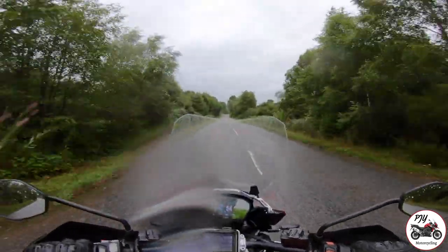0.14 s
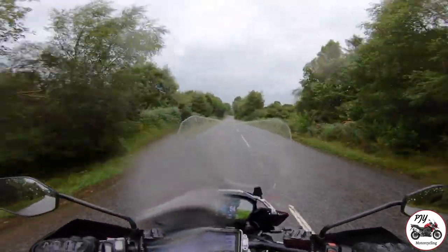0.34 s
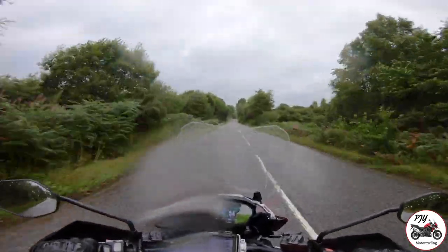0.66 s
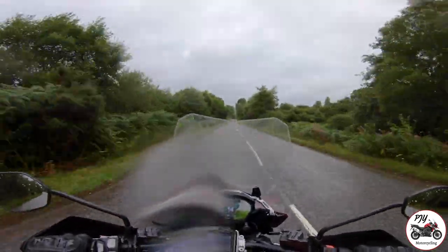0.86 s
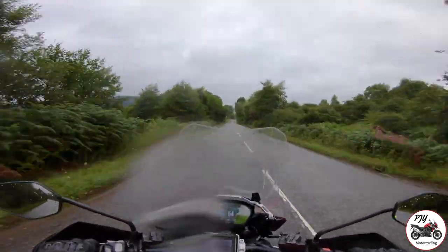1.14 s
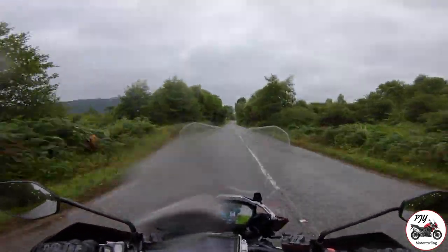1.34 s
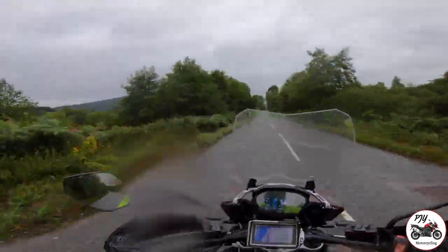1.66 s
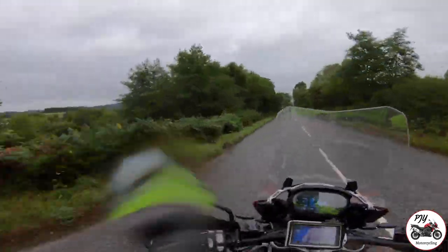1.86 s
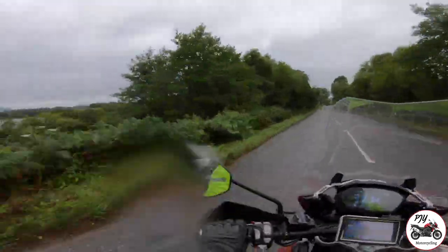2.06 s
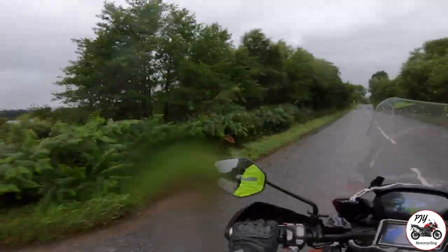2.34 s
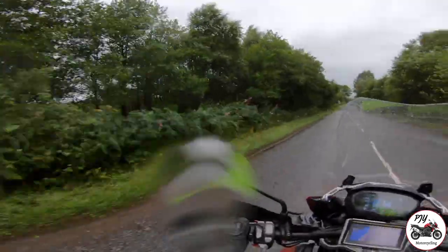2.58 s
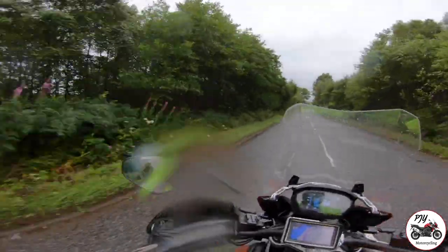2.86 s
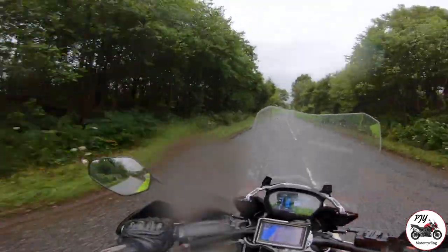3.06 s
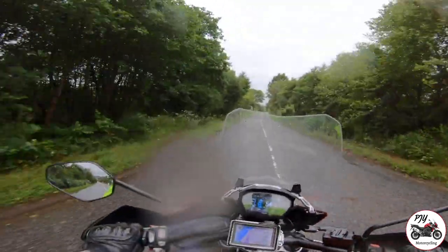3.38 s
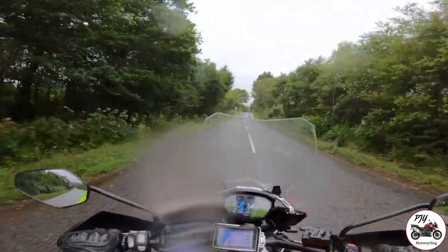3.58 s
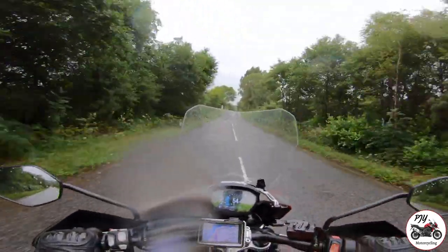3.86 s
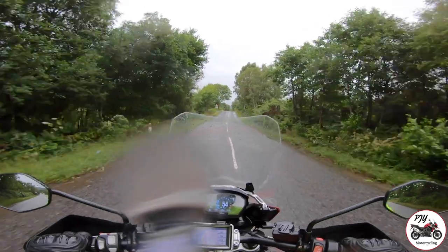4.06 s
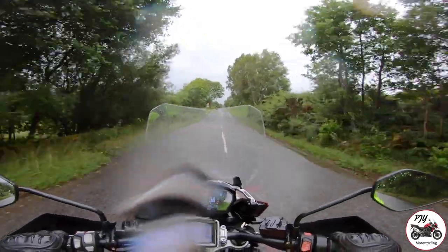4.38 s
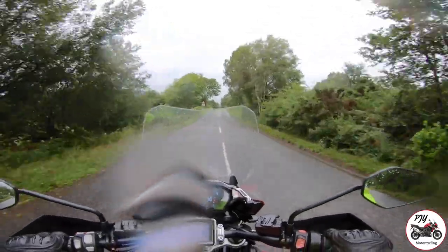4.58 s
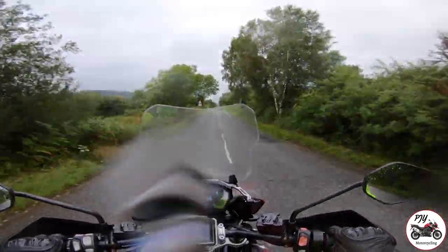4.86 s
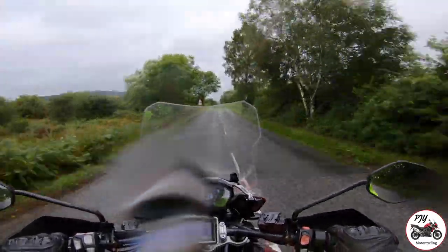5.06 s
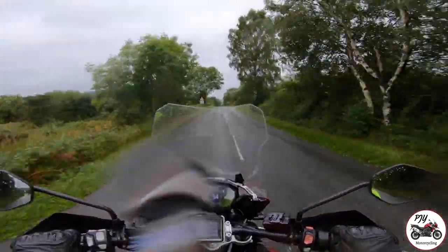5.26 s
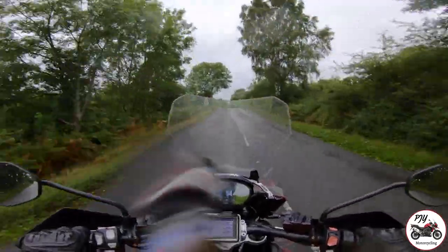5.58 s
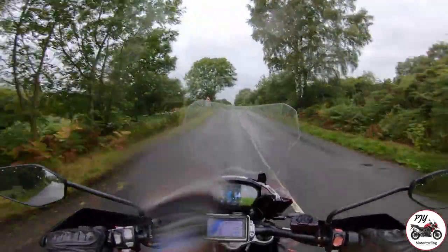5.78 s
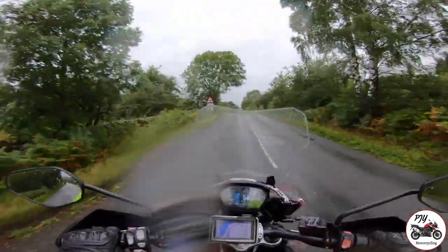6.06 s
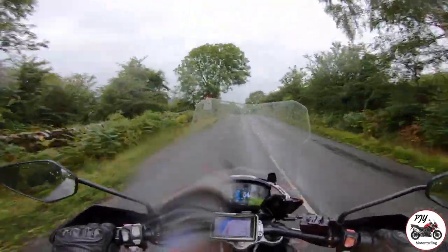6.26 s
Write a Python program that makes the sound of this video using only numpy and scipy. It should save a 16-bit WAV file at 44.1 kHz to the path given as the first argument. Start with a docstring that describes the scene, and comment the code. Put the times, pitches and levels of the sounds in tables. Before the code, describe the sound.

Throughout about 6.4 seconds, a three-cylinder motorcycle cruises on wet tarmac, heard from a microphone worn by the rider. A deep hum near 75 hertz throbs unevenly, easing almost imperceptibly in pitch, with low overtones, wavering gear whine and fast valve clatter. Strong subsonic-to-low wind buffeting, muffled thuds and airy rush cover it, while tyres give a coarse midrange roar and fine wet hiss. Drops tick irregularly on plastic, with a tight cluster at 1.0. From 1.3 to 2.0 the rider turns aside: clatter recedes, road roar rises slightly, and a faint sizzle and denser ticks appear. Gusts thump at 1.7 and 2.05; the loudest drop cracks at 2.43. By 3.3 the head faces forward, with a spattering drop at 3.36. Wind pops at 3.83 and around 5.15 to 5.25; steady riding continues, ticking once more at 6.3.

```python
"""A three-cylinder motorcycle cruises on a wet road, heard close up from a camera worn by the rider.
The exhaust drones as sines on the firing rate, the gears whine in wavering lines, and bursts of noise
clatter in step with the firings. Filtered noise makes the wind, with thuds and pops at the microphone,
the tyre hiss from the road below, and the mist; drops of water tick as short rings and splashes
against the camera housing."""
import sys
import numpy as np
from scipy import signal
from scipy.fft import rfft, irfft, next_fast_len
from scipy.io import wavfile
from scipy.ndimage import uniform_filter1d

SR = 44100
rng = np.random.default_rng(int(sys.argv[2]) if len(sys.argv) > 2 else 0)


def dump(signal):
    """Clip the signal to [-1, 1] and save it as 16-bit WAV at the path in sys.argv[1]."""
    limited = np.clip(np.atleast_2d(signal).T, -1, 1)
    pcm = np.round(limited * 32767).astype(np.int16)
    wavfile.write(sys.argv[1], SR, pcm)


N = 283246
TIME = np.arange(N) / SR  # s

# engine speed on a steady throttle, before its small flutter: (time [s], firing rate [Hz])
SPEED = [(0, 75.56), (1.3, 75.55), (2, 75.2), (2.7, 75.04), (4.4, 75.16), (5.3, 75.02), (5.9, 74.69),
         (6.42, 74.57)]
# deep hum of the exhaust at the firing rate, before its throb: (time [s], level [dB])
HUM = [(0, -24), (.45, -25), (.9, -27.5), (1.2, -31), (1.65, -25), (2.2, -26.5), (2.8, -27.5), (3.15, -25),
       (3.55, -28), (3.9, -23), (4.15, -31.5), (4.4, -24.5), (4.65, -29), (5.05, -24), (5.3, -31),
       (5.8, -26.5), (6.42, -28.5)]
# exhaust overtones: (multiple of the firing rate)
EXHAUST_ORDERS = [3, 4, 5]
# their levels at the start, before road swell and waver: (level [dB])
EXHAUST_DB = [-38.5, -35.5, -50]
# their drift as the engine eases off: (slope [dB per s])
EXHAUST_DB_PER_S = [0.53, -0.17, 0]

# lines of the gear and chain whine: (multiple of the firing rate)
GEAR_ORDERS = [11.18, 12.65, 19.17, 22.36, 22.61, 26.6, 28.75, 29.95, 44.65]
# their balance at the start: (relative level [dB])
GEAR_DB = [-0.5, -4, -5, -14.5, -12.5, -10, -20.5, -14.5, -20.5]
# drift of that balance as the load on the gears eases: (slope [dB per s])
GEAR_DB_PER_S = [0, -1.8, -2.5, 1, 0.1, 0, 0.8, -1.3, 0]
# swell of the whine with the load on the gears: (time [s], level about the usual [dB])
WHINE = [(0, -1), (.58, 0.5), (.7, -0.5), (1.0, 3), (1.4, -1), (1.8, 0.5), (2.6, 2.5), (3.25, 1),
         (3.55, -1.5), (3.88, 4), (4.05, 0), (4.5, -.5), (4.8, -1), (5.15, 0), (5.38, -3), (5.65, 3),
         (6.42, -0.5)]

# swell of machine and road noise from below the rider: (time [s], level about the usual [dB])
ROAD = [(0, -2.5), (.25, -.5), (.6, -0.3), (.8, -1.5), (.97, -1), (1.1, -3.5), (1.3, -2), (1.8, -1),
        (2.6, -1), (2.87, -2), (3.25, 1.85), (3.6, 0.5), (3.95, 0.6), (4.35, 0.4), (4.7, -1.5), (5.1, 0.5),
        (5.6, -2.2), (6.42, 1.2)]
# the rider looks to the side and back: (time [s], share of the full turn [0-1])
HEAD_TURN = [(1.3, 0.09), (2.05, 1), (2.65, 0.9), (3.3, 0)]
# strength of the airstream on the camera: (time [s], level about the usual [dB])
AIRSTREAM = [(0, -2.5), (.3, -1.5), (.6, 0), (.95, 0.5), (1.1, -2.5), (1.25, -1), (2.0, 1.5), (2.25, -3.5),
             (2.8, -1.5), (3.35, 2.5), (3.65, -1.5), (3.95, 2.5), (4.25, -3), (4.75, -0.5), (5.2, -1),
             (5.55, -2), (6.42, 1.5)]

# spectra of the noise layers, each: (frequency [Hz], relative level [dB])
CLATTER_SPECTRUM = [(300, -48), (1000, -19.5), (1800, -6), (2000, -1), (2170, 3), (2400, -2), (2540, -2),
                    (2720, -10), (3100, -14.5), (4200, -36), (12000, -87)]  # valve gear
BUFFET_SPECTRUM = [(2, -5), (6, 1), (16, -2), (30, -7), (50, -15), (80, -25), (140, -38), (400, -65),
                   (4000, -130)]  # large eddies
THUD_SPECTRUM = [(30, -24), (70, 1), (110, 0.5), (165, -1.5), (250, -10), (400, -23), (1000, -51),
                 (10000, -110)]  # smaller eddies that thud
RUSH_SPECTRUM = [(60, -22.5), (150, -6.5), (220, 1.5), (330, 1), (430, 0), (520, -5.5), (610, -14),
                 (800, -22.5), (2000, -46.5), (12000, -86.5)]  # air rushing past
TYRE_SPECTRUM = [(100, -51), (400, -28), (650, -6.5), (715, 5), (745, 0), (785, -0.5), (900, 1.5),
                 (1050, -0.5), (1220, -2.5), (1370, -2), (1550, -6), (1850, -8.5), (4000, -39),
                 (12000, -89)]  # tread on tarmac
SPRAY_SPECTRUM = [(1500, -10), (2800, -2.5), (3120, -4), (3350, 2.5), (3600, 1.5), (4000, 1.5), (4150, -2),
                  (4350, -8), (4600, -9.5), (5300, -13), (6900, -23.5), (8200, -31.5), (9500, -40),
                  (11000, -43.5), (16000, -53.5)]  # water flung by the tread
MIST_SPECTRUM = [(2000, -29), (4500, -3.5), (5800, 1.5), (7500, -9), (8400, -17), (9300, -6),
                 (10500, -25.5), (16000, -35)]  # tiny droplets on the camera
# how the camera housing passes a blow: (frequency [Hz], gain [dB])
HOUSING = [(800, -7), (2000, -1), (3800, 1.5), (5500, 1), (7000, -8), (9500, -20), (11000, -32),
           (16000, -35)]

# gusts on the microphone:
# (centre time [s], length [s], eddy rise [dB], thud rise [dB], rush rise [dB])
GUSTS = [(0.287, .26, 3.5, 5, 3.5), (0.525, 0.47, 2.5, -1.5, 0.5), (0.943, 0.095, 2, 0, 2.5),
         (1.438, 0.14, -1, 2, 3.5), (1.706, 0.33, -0.5, 8, 0.5), (1.85, 0.14, 0.5, 0.5, 1),
         (2.044, 0.2, 2, 9, -1), (2.452, 0.15, 6.5, 7, 1.5), (2.657, 0.13, 4, 8.5, 2.5),
         (3.023, 0.15, -2, 6, 0.5), (3.227, .3, -2, 3.5, 1), (3.383, 0.24, 0, 1, 2.5),
         (3.835, 0.12, -5, 9, 2), (3.964, 0.15, 2, -5, 1.5), (4.372, 0.33, 1.5, 3.5, 4),
         (4.506, 0.13, 6, 6, 3.5), (4.918, 0.36, 1.5, 5, -1), (5.124, 0.17, 5, 9.5, 3.5),
         (5.266, 0.13, 1.5, 6, 1), (5.75, .14, -4, -4, 2), (6.32, 0.2, -1.5, -2, 2)]
# lulls and changes of pressure between gusts: (centre time [s], length [s], level change [dB])
LULLS = [(0.78, 0.2, -7), (1.122, 0.14, -7), (1.543, .1, -1.5), (2.296, 0.2, 3.5), (2.9, .1, 1),
         (4.156, .16, 0), (4.6, 0.16, -7), (5.38, 0.079, -2), (5.56, 0.12, 2.5)]
# tight vortices at the microphone, before the band-pass: (time [s], peak level [dB], length [s])
POPS = [(1.435, -20, .005), (1.706, -9, .016), (2.044, -11, .004), (3.830, -7, .01), (5.1395, -14, 0.002),
        (5.171, -11, .003), (5.259, -14, .003)]
# big drops on the housing:
# (time [s], relative strength [dB], ring [Hz], splash share [0-1], spatter after it [0-1])
DROPS = [(.0144, -17.5, 4040, 0.8, 0.1), (.0359, -24, 4200, .45, .1), (0.4955, -16, 3900, 0.57, .15),
         (0.5692, -14, 3620, 0.16, 0.3), (0.7296, -16, 4400, 0.55, 0), (0.772, -16.5, 3640, 0.34, .1),
         (.9195, -25, 4200, 0.6, .1), (.9873, -21, 4330, .6, .1), (0.9906, -7.5, 2600, 0.28, 0),
         (.9918, -10.5, 4120, .5, .33), (.9935, -20, 3850, 0.2, .05), (1.0395, -22, 4200, .5, .1),
         (1.1535, -27, 4200, .6, .1), (1.16, -28, 4200, .6, .1), (1.2386, -22, 3780, 0.4, .1),
         (1.273, -18, 3880, 0.37, 0.1), (1.3781, -27, 4200, 0.7, .1), (1.7448, -19, 3160, 0.4, 0.4),
         (1.9882, -16.5, 4020, 0.45, .2), (2.0352, -24, 4000, 0.5, .1), (2.103, -13.5, 4200, 0.5, 0.2),
         (2.1228, -17, 4280, .45, 0), (2.1552, -24, 4200, 0.4, .1), (2.2017, -18, 3900, .5, .1),
         (2.339, -13, 3760, 0.15, 0.2), (2.357, -9.5, 3840, 0.5, 0.25), (2.3625, -18, 3840, 0.1, 0.2),
         (2.3845, -23, 4200, 0.5, 0.2), (2.4319, -1.7, 3800, 0.47, 0.26), (2.4695, -15, 4300, 0.64, 0.1),
         (2.5063, -22, 4400, 0.6, 0), (2.5636, -18, 3700, .2, 0), (2.7181, -20, 4170, 0.5, 0.2),
         (2.7725, -20, 3990, .3, .1), (2.8677, -25, 4400, .5, .3), (2.924, -20, 3900, .2, 0.2),
         (2.9472, -17.5, 4100, .45, .1), (3.0023, -23, 4200, 0.5, .1), (3.1577, -24, 4200, .5, 0.2),
         (3.3567, -11.5, 3400, 0.33, 0.57), (3.4447, -17, 3760, 0.15, .1), (3.6666, -20, 3690, .5, .1),
         (3.6918, -20, 3900, 0.7, .1), (3.6998, -17.5, 3780, 0.2, .15), (3.7289, -23, 4000, .45, 0.4),
         (3.7685, -25, 4200, 0.5, .1), (3.7939, -21, 4200, 0.3, .1), (3.9655, -26, 4400, 0.1, .1),
         (4.1963, -28, 4200, 0.6, .1), (4.236, -20, 3684, 0.2, 0.2), (4.343, -19, 3850, .35, .1),
         (4.842, -17, 3650, 0.27, .1), (5.2283, -20, 5200, 0.53, 0.1), (5.312, -21, 4100, 0.4, .1),
         (5.404, -20, 4270, 0.4, .1), (5.4198, -24, 4600, .35, .1), (5.497, -22, 4200, 0.6, .1),
         (5.6125, -24, 4300, 0.6, .2), (5.7913, -21, 4000, 0.4, 0), (5.8374, -21.5, 4000, 0.23, .1),
         (5.8674, -21, 4700, .56, 0), (6.0615, -23, 3770, 0.3, 0), (6.253, -27, 4260, 0.5, .1),
         (6.3053, -12.5, 4300, .45, .15)]

# wind layers: level in the usual airstream (dB) and how much each follows it (dB per dB)
EDDY_DB, THUD_DB, RUSH_DB = -15.5, -31, -28
EDDY_FOLLOW, THUD_FOLLOW, RUSH_FOLLOW = 0.67, 1.46, 0.44
# the rush builds along the road and the tyre roar fades as the machine eases off (dB per s)
RUSH_DB_PER_S, ROAR_DB_PER_S = 0.1152, -0.1649
# usual levels with the head straight (dB), and their change with the head fully turned (dB)
ROAR_DB, CLATTER_DB, SPRAY_DB, WHINE_DB, MIST_DB = -29.5, -33, -40, -36, -72
ROAR_TURN_DB, CLATTER_TURN_DB, SPRAY_TURN_DB, MIST_TURN_DB = 1.5, -3.5, 0.6, 7.5
# small drops: splash share and spatter (0-1), and extra hits at full turn (times the usual rate)
SMALL_SPLASH, SMALL_SPATTER, TURN_EXTRA_DROPS = 0.4, .1, 2.5
TOP_HZ = 15800  # upper edge of the camera's sound


def undb(db):
    """Decibels to gain."""
    return 10 ** (np.asarray(db) / 20)


def unit(x):
    """Scale to rms 1."""
    return x / np.sqrt(np.mean(x ** 2))


def curves(table):
    """Each column of a table, joined by straight lines in time."""
    s, *columns = np.transpose(table)
    return [np.interp(TIME, s, c) for c in columns]


def colour(x, spectrum):
    """Causal minimum-phase filter with the given (frequency [Hz], level [dB]) response."""
    size = next_fast_len(N + 8192)
    hz, db = np.transpose(spectrum)
    bins = np.maximum(np.arange(size // 2 + 1) * SR / size, 1)
    response_db = np.interp(np.log(bins), np.log(hz), db)
    cepstrum = irfft(np.log(undb(response_db)), size)
    # folding the cepstrum onto positive time makes the filter causal
    cepstrum[1:size // 2] *= 2
    cepstrum[size // 2 + 1:] = 0
    response = np.exp(rfft(cepstrum))
    return irfft(rfft(x, size) * response, size)[:N]


def noise(spectrum, gate=1):
    """Gated noise through a response, rms 1."""
    return unit(colour(gate * rng.standard_normal(N), spectrum))


def walk(rate):
    """Smooth chance with about rate turns a second; rms 1."""
    k = max(int(SR / rate), 2)
    steps = np.repeat(rng.standard_normal(N // k + 2), k)
    smooth = uniform_filter1d(uniform_filter1d(steps, k), k)
    return unit(smooth[:N])


def bump(s, length):
    """A smooth swell from 0 to 1 and back, centred on s."""
    return np.cos(np.pi * np.clip((TIME - s) / length, -.5, .5)) ** 2


def exhaust(firings, hum_db, road_db, throb_db=1.9, waver_db=1.37):
    """The silencer leaves a deep, throbbing hum and a few low overtones of the firings."""
    out = undb(hum_db + throb_db * walk(14)) * unit(np.sin(2 * np.pi * firings))
    for order, db, slope in zip(EXHAUST_ORDERS, EXHAUST_DB, EXHAUST_DB_PER_S):
        level = undb(db + road_db + slope * TIME + waver_db * walk(7.8))
        out = out + level * unit(np.sin(2 * np.pi * (order * firings + rng.random())))
    return out


def gears(firings, whine_db):
    """Meshing teeth whine; backlash and changing load make each line waver."""
    lash, waver_db = .38, 1.5  # phase wander (rad) and level wander (dB)
    lines = np.zeros(N)
    for order, db, slope in zip(GEAR_ORDERS, GEAR_DB, GEAR_DB_PER_S):
        level = undb(db + slope * TIME + waver_db * walk(20))
        lines += level * np.sin(2 * np.pi * order * firings + lash * walk(30))
    return unit(lines) * undb(whine_db)


def clatter(firings, decay=0.39, depth=0.89):
    """Valves land six times in each engine cycle of three firings, each with its own force."""
    force = np.array([0.87, 0.31, 1.0, 0.72, 0.75, 0.16])
    beats = 2 * firings
    fade = np.exp(-(beats % 1) / (2 * decay))  # decay counts in firings
    gate = 1 + depth * force[beats.astype(int) % len(force)] * fade
    return noise(CLATTER_SPECTRUM, gate)


def gusts():
    """Gusts swell and die away, lulls shift eddy and thud together; eddy, thud and rush changes in dB."""
    eddy_db, thud_db, rush_db = sum(np.outer(rise_db, bump(s, length)) for s, length, *rise_db in GUSTS)
    lull_db = sum(db * bump(s, length) for s, length, db in LULLS)
    return eddy_db + lull_db, thud_db + lull_db, rush_db


def wind(air_db, flutter_db=0.5, thud_flutter_db=1.5):
    """Large eddies push on the microphone; smaller ones thud and rush past it in shared flurries."""
    buffet = noise(BUFFET_SPECTRUM)
    # even out chance swells so that the tables set the level
    buffet /= np.sqrt(uniform_filter1d(buffet ** 2, SR // 8))
    flurries = undb(flutter_db * walk(30))
    thud = noise(THUD_SPECTRUM, flurries * undb(thud_flutter_db * walk(36)))
    rush = noise(RUSH_SPECTRUM, flurries)
    eddy_rise_db, thud_rise_db, rush_rise_db = gusts()
    eddy_db = EDDY_DB + EDDY_FOLLOW * air_db + eddy_rise_db
    thud_db = THUD_DB + THUD_FOLLOW * air_db + thud_rise_db
    rush_db = RUSH_DB + RUSH_FOLLOW * air_db + RUSH_DB_PER_S * TIME + rush_rise_db
    return buffet * undb(eddy_db) + thud * undb(thud_db) + rush * undb(rush_db)


def tyres(roar_db, spray_db, grain_db=1.5):
    """Tread roars on the coarse tarmac and flings a fine, grainy spray."""
    roar = noise(TYRE_SPECTRUM) * undb(roar_db)
    spray = noise(SPRAY_SPECTRUM, undb(grain_db * walk(900))) * undb(spray_db)
    return roar + spray


def mist(turn, linger_s=.55, grain_db=4):
    """Countless tiny droplets sizzle on the camera, most while the head is turned and a moment after."""
    wet = np.maximum(turn, np.interp(TIME - linger_s, TIME, turn))
    sizzle = noise(MIST_SPECTRUM, undb(grain_db * walk(700)))
    return sizzle * undb(MIST_DB + MIST_TURN_DB * wet)


def tick(ring_hz, share, spatter, splash_db=3, fragment_db=0, snap_db=8, knock_hz=2450, knock_db=-13):
    """A drop knocks the shell, rings the plastic for a few cycles and splashes; the wave comes back once.
    A drop that shatters also snaps in the top treble, and its fragments spatter after it."""
    decay_s, echo_s, echo, spatter_s, snap_hz = .001, .002, .35, .006, 11500
    t = TIME[:SR // 30]
    envelope = (1 - np.exp(-t / .0001)) * np.exp(-t / decay_s)
    knock = undb(knock_db) * np.sin(2 * np.pi * knock_hz * t)
    ring = envelope * (np.sin(2 * np.pi * ring_hz * t) + knock)
    burst = envelope * rng.standard_normal(len(t))
    # a drop that rings low also splashes low
    highpass = signal.butter(2, np.clip(0.37 * ring_hz, 100, 5000), "high", fs=SR, output="sos")
    splash = signal.sosfilt(highpass, burst)
    spray = (t > echo_s) * np.exp(-t / spatter_s) * rng.laplace(size=len(t))
    fragments = signal.sosfilt(highpass, spray)
    snap = signal.sosfilt(signal.butter(6, snap_hz, "high", fs=SR, output="sos"), burst)
    shatter = undb(fragment_db) * unit(fragments) + undb(snap_db) * unit(snap)
    share = np.clip(share, 0, 1)
    body = (1 - share) * unit(ring) + share * undb(splash_db) * unit(splash)
    hit = np.std(ring) * (body + max(spatter, 0) * shatter)
    return hit + echo * np.interp(t - echo_s, t, hit, left=0)


def drops(turn, small_db=-33, spread_db=3, count=170):
    """Big drops strike the housing one by one; small ones fall at random, thicker with the head turned."""
    fallen = np.cumsum(1 + max(TURN_EXTRA_DROPS, 0) * np.clip(turn, 0, 1))
    small = []
    for a, b, c in rng.random((count, 3)):
        s = np.interp(a * fallen[-1], fallen, TIME)
        db = small_db + spread_db * (2 * b - 1)
        small.append((s, db, 3000 + 2000 * c, SMALL_SPLASH, SMALL_SPATTER))
    out = np.zeros(N + SR)
    for s, db, ring_hz, share, spatter in list(DROPS) + small:
        start, hit = int(s * SR), tick(ring_hz, share, spatter)
        out[start:start + len(hit)] += undb(db) * hit
    return colour(out[:N], HOUSING)


def pops(air_db, small_db=-25, spread_db=3, small_s=0.0037, count=150):
    """A vortex core crossing the microphone sucks the pressure down; faint ones pass at random."""
    small = []
    for a, b, c in rng.random((count, 3)):
        s = a * TIME[-1]
        db = small_db + spread_db * (2 * b - 1) + np.interp(s, TIME, air_db)
        small.append((s, db, small_s * (.5 + c)))
    t, out = TIME[:SR // 10], np.zeros(N + SR)
    for s, db, length in list(POPS) + small:
        start = int(s * SR)
        age = t / max(length / 4, 1e-4)  # the dip is deepest at age 1
        out[start:start + len(t)] -= undb(db) * age * np.exp(1 - age)
    return signal.sosfilt(signal.butter(2, [20, 3000], "band", fs=SR, output="sos"), out[:N])


def scene():
    """All sources at the one microphone; turning the head trades engine clatter for road noise."""
    firing_hz = curves(SPEED)[0] * (1 + 0.00051 * walk(7))
    firings = np.cumsum(firing_hz) / SR  # count of firings so far
    turn, road_db, air_db = curves(HEAD_TURN)[0], curves(ROAD)[0], curves(AIRSTREAM)[0]
    drone = exhaust(firings, curves(HUM)[0], road_db)
    whine = gears(firings, WHINE_DB + road_db + curves(WHINE)[0])
    valves = clatter(firings) * undb(CLATTER_DB + road_db + CLATTER_TURN_DB * turn)
    roar_db = ROAR_DB + road_db + ROAR_TURN_DB * turn + ROAR_DB_PER_S * TIME
    spray_db = SPRAY_DB + road_db + SPRAY_TURN_DB * turn
    engine = drone + whine + valves
    air = wind(air_db) + pops(air_db)
    water = drops(turn) + mist(turn)
    return (engine + air + tyres(roar_db, spray_db) + water)[None]


def record(dry):
    """The camera cuts the top with a steep low-pass."""
    return signal.sosfilt(signal.ellip(8, .2, 70, TOP_HZ, fs=SR, output="sos"), dry)


dry = scene()
out = record(dry)
dump(out)
```